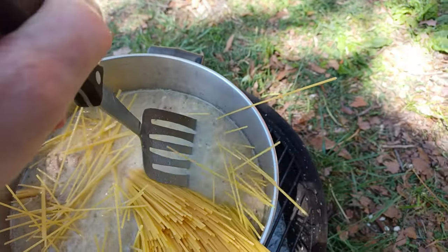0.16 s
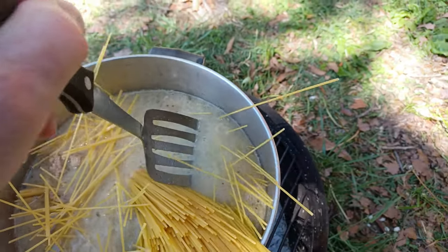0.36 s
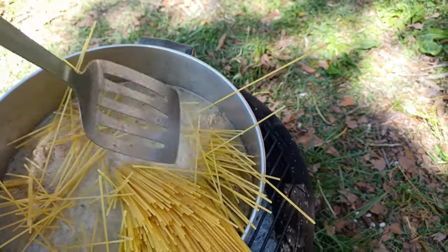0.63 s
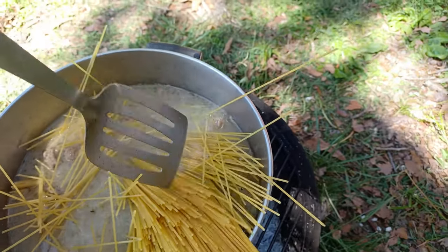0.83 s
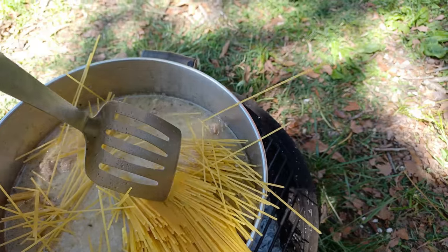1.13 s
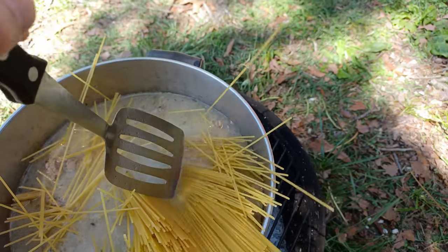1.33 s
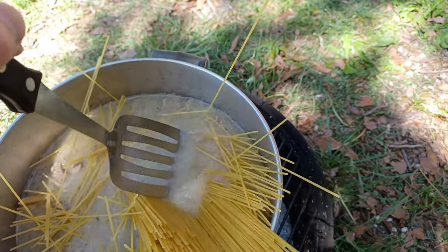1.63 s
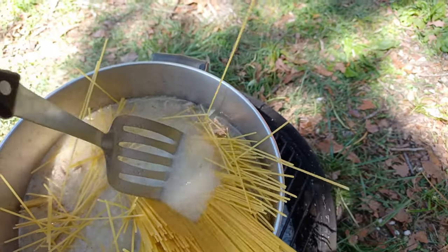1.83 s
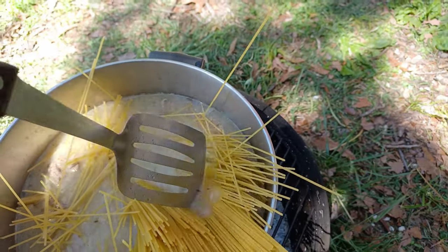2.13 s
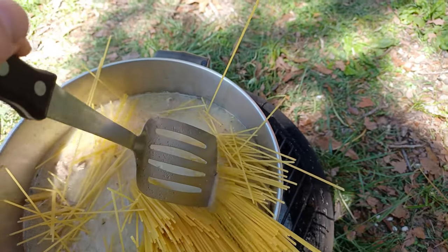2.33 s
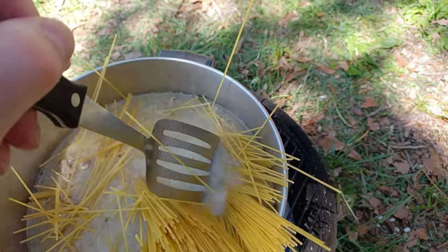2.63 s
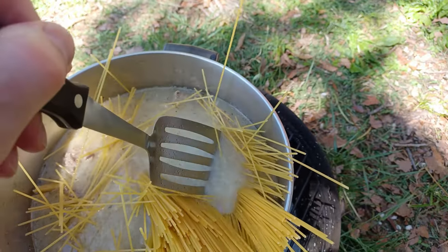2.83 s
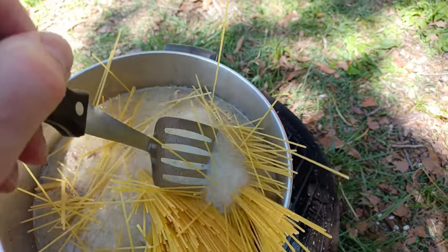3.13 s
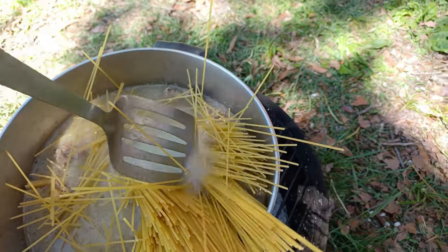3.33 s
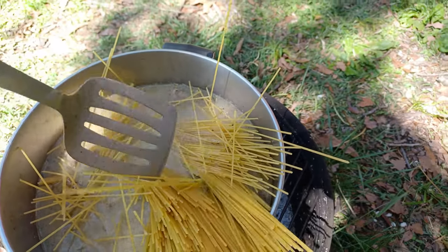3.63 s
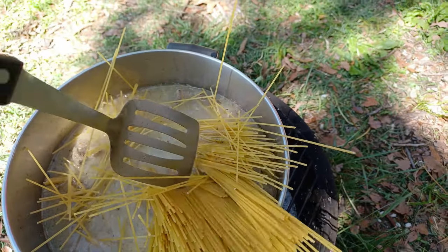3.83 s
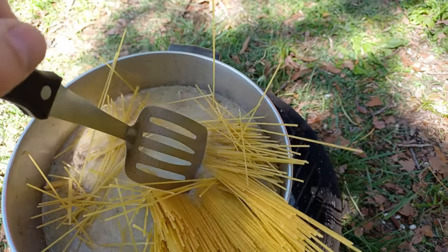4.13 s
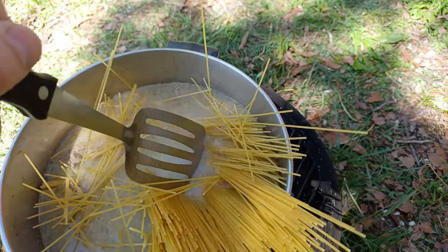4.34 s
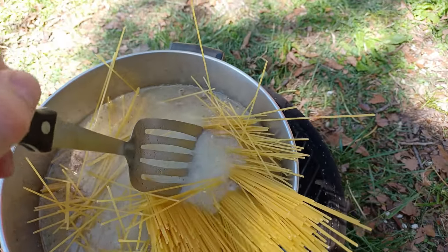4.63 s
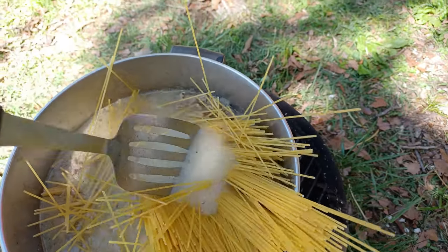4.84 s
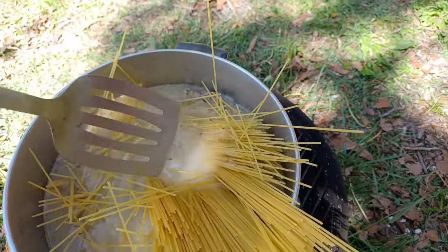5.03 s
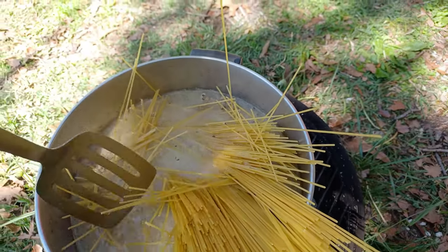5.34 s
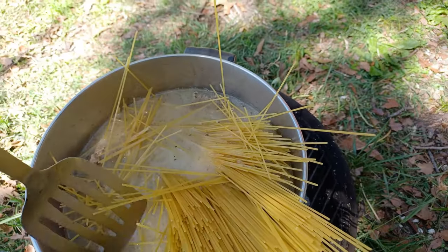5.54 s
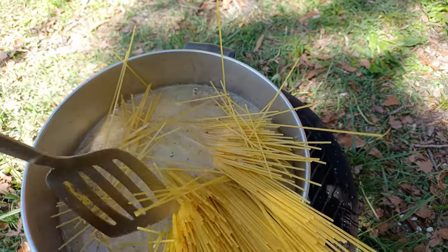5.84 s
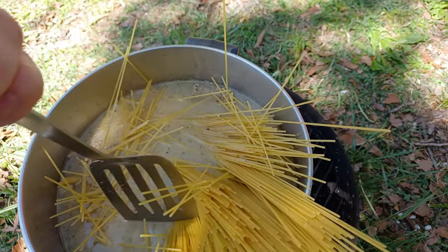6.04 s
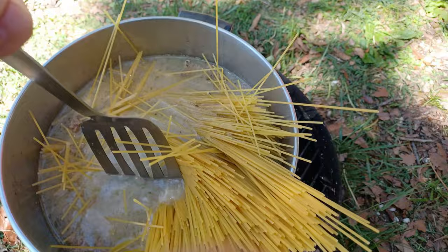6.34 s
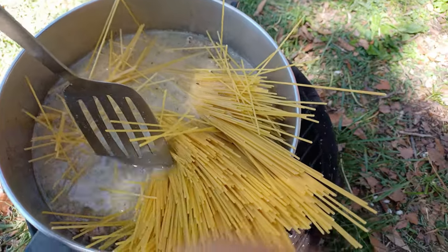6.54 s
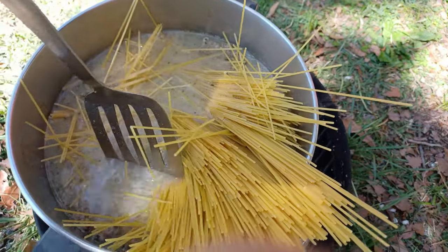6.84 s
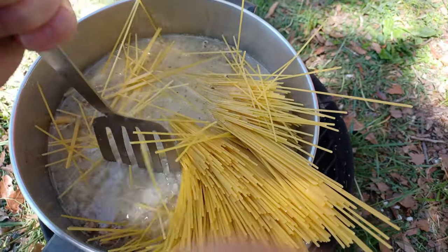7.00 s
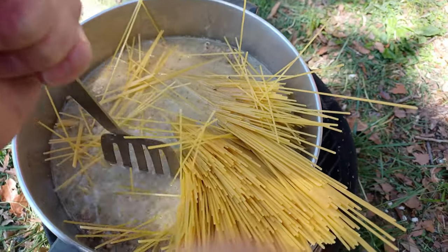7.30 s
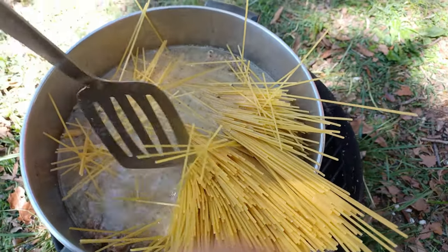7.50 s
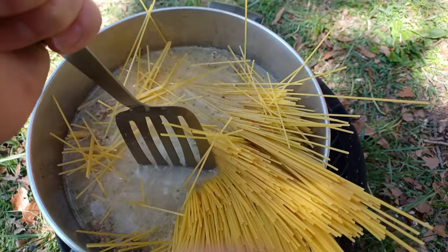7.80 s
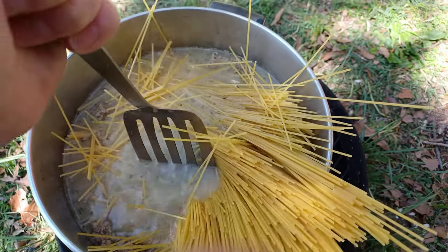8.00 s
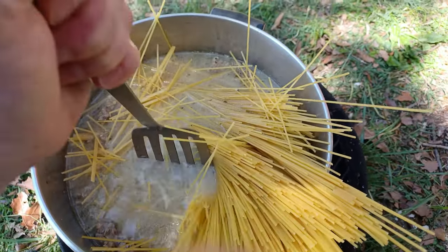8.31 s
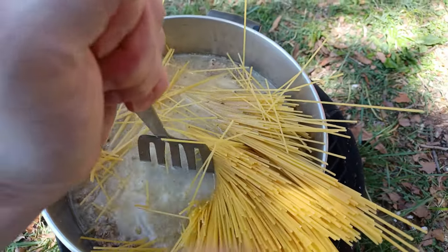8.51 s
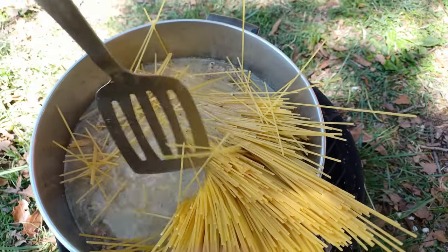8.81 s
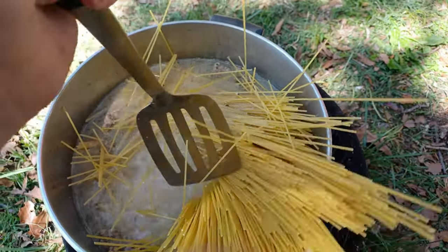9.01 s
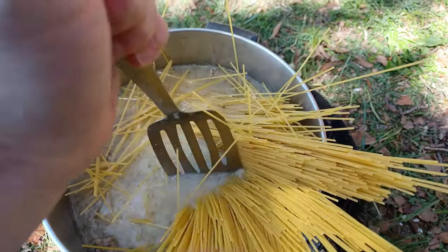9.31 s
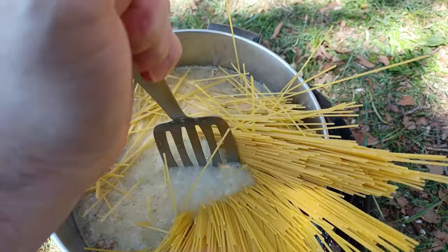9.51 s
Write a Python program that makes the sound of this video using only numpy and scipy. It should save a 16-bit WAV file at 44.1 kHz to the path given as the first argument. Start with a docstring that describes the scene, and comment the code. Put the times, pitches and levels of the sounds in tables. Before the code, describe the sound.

Close stereo outdoors, over quiet open air and a fine simmering fizz. At 0-0.35 s brittle pasta strands snap in quick, dry clicks. From 0.4 to 1.65 s a bird whistles clear falling notes with short links, echoing in trees, while water sizzles in short swells, strong near 0.9 s. A single snap comes at 1.6 s, then a soft, woody cluster at 2.3-3.1 s, ending in a tiny rising squeak. Hiss surges near 3.8 s; faint lower rising whistles run 3.6-4.8 s, with a few snaps around 4.6 s. A bright metal knock lands at 5.4 s. Wind thumps and rumbles from about 5.4 s, strongest around 6.1 s, returning until 9.4 s. Sharp cracking bursts at 6.9-7.1 s, a strong sizzle at 7.6 s, then the densest, loudest crunching at 8.0-8.5 s with hollow pot thuds. Hiss swells at 9 s; last snaps come at 9.3-9.65 s.

```python
"""At an outdoor grill, a steel spatula pushes dry spaghetti into a metal pot of boiling water.
Strands snap singly and in bundles, as shaped noise clicks that ring the pot through decaying modes.
Water slops sizzle as swelling bands of random bursts; gusts are low noise on the close microphone.
A songbird whistles two phrases of gliding sines; the blade squeaks once and knocks the pot."""
import sys
import numpy as np
from scipy import signal
from scipy.fft import rfft, irfft, next_fast_len
from scipy.io import wavfile
from scipy.ndimage import uniform_filter1d

SR = 44100
rng = np.random.default_rng(int(sys.argv[2]) if len(sys.argv) > 2 else 0)


def output_pcm(signal):
    """Save a mono or channel-first signal as 16-bit PCM at the path in sys.argv[1].

    Samples are clipped to [-1, 1] before scaling.
    """
    pcm = np.clip(np.atleast_2d(signal).T, -1, 1) * 32767
    wavfile.write(sys.argv[1], SR, np.round(pcm).astype(np.int16))


N = 426006
T = np.arange(N) / SR
T_COARSE = T[::32]  # for slow envelopes
LEAD_S = .005  # room for the rise before a break
TOP_HZ = 16150
# Stereo balance of the pot. Each row: frequency in Hz, left minus right in dB.
POT_PAN = [(600, 1.5), (1290, 8), (2380, 7.5), (4400, 3.5), (8000, -0.5), (15000, 4.5)]


def undb(db):
    """Decibels to gain."""
    return 10 ** (np.asarray(db) / 20)


def unit(x):
    """Scale to rms 1."""
    return x / np.sqrt(np.mean(x ** 2) + 1e-20)


def along(points, hz):
    """Read a (Hz, dB) spectrum on a log-frequency axis."""
    point_hz, point_db = np.transpose(points)
    return np.interp(np.log(hz + 1), np.log(point_hz), point_db)


def coloured(x, points):
    """Filter a signal by a (Hz, dB) response."""
    size = next_fast_len(N)
    gain = undb(along(points, np.fft.rfftfreq(size, 1 / SR)))
    return irfft(rfft(x, size) * gain, size)[..., :N]


def walk(rate_hz):
    """Smooth random curve with a spread near 1: lines between random knots."""
    knots = rng.standard_normal(4096)
    return 1.2 * np.interp(T * rate_hz, np.arange(len(knots)), knots)


def pair(size, likeness):
    """Left and right noise with a shared part."""
    noise = rng.standard_normal((3, size))
    shared = np.clip(likeness, 0, 1)
    return np.sqrt(shared) * noise[0] + np.sqrt(1 - shared) * noise[1:]


def sides(pan_db):
    """Left and right gains of constant total power; pan is left minus right."""
    gain = undb(np.array([[.5], [-.5]]) * pan_db)
    return gain / np.sqrt(np.mean(gain ** 2, axis=0))


def add(out, start_s, x):
    """Mix a short sound in, trimmed at both ends of the scene."""
    i = min(int(start_s * SR), N - 1)
    x, i = x[:, max(-i, 0):], max(i, 0)
    out[:, i:i + x.shape[1]] += x[:, :N - i]


def ring(x, modes):
    """Resonance: convolve with decaying sines of (Hz, dB, t60 s), alternating in sign."""
    t = np.arange(SR // 3) / SR
    response = np.zeros(len(t))
    for k, (hz, db, t60_s) in enumerate(modes):
        response += (-1) ** k * undb(db - 60 * t / t60_s) * np.sin(2 * np.pi * hz * t)
    return signal.fftconvolve(x, response[None], axes=1)


def echoes(x, t60_s):
    """Diffuse reflections: convolve with a decaying noise tail, scaled to unit energy on the left."""
    t = np.arange(SR // 2) / SR
    tail = pair(len(t), likeness=.6) * undb(-60 * t / t60_s) * (t > .003)
    return signal.fftconvolve(x, tail / np.sqrt(np.sum(tail[0] ** 2)), axes=1)[:, :N]


def disperse(hz, spread_s):
    """Bending waves are slow at low pitch, so a click's lows lag its highs (no delay at 3 kHz)."""
    return np.exp(-2j * np.pi * spread_s * (2 * np.sqrt(3000 * hz) - hz))


def crack(stub_hz, body_db, crisp_db, pan_db, rise_s=0.00076, spike_s=0.00052, shiver_s=0.0026,
          shiver=1.2, stub_db=7, stub_width=0.16, ripple_db=2, lead=0.15, lead_s=0.0011,
          spread_s=0.000467, size=1024):
    """One break: soft noise rise, spike, then stubs shivering at a pitch set by length; rms 1 over 4 ms."""
    # Colour of a break. Each row: frequency in Hz, gain in dB.
    snap_colour = [(100, -40), (280, -21.5), (400, -10.5), (700, -7), (900, -9), (1200, -6.5), (1800, -2.5),
                   (3000, 2), (4500, 4.5), (6200, 4), (8000, -1), (10000, 2), (12500, 7.5), (16000, 3)]
    t, hz = np.arange(size) / SR - LEAD_S, np.fft.rfftfreq(size, 1 / SR)
    before, after = np.minimum(t, 0), np.maximum(t, 0)
    onset = np.exp(before / rise_s) + lead * np.exp(before / lead_s)
    decay = np.exp(-after / spike_s) + shiver * np.exp(-after / shiver_s)
    left, right = rfft(pair(size, likeness=0.63) * onset * decay)

    # long waves are alike at both ports; the right one mostly hears the sound slightly later
    apart = np.clip(hz / 3000, 0, 1)
    delay_s = 6e-5 + 2.5e-5 * rng.standard_normal()
    right = (apart * right + (1 - apart) * left) * np.exp(-2j * np.pi * hz * delay_s)

    stubs = stub_db * np.exp(-(np.log((hz + 1) / stub_hz) / stub_width) ** 2)
    ripple = ripple_db * np.interp(hz, np.linspace(0, SR / 2, 48), rng.standard_normal(48))
    tilt = along([(1400, body_db), (3000, 0.02), (6500, 0.004), (10000, crisp_db)], hz)
    colour = undb(along(snap_colour, hz) + tilt + stubs + ripple) * disperse(hz, spread_s)
    x = irfft(np.array([left, right]) * colour * sides(pan_db + along(POT_PAN, hz)))
    return x / np.sqrt(np.sum(x ** 2) / (2 * .004 * SR))


def strands(snap_db=1, bundle_db=1, scatter_db=4.0, count=16):
    """Single strands snap; a bundle gives way in a shower of smaller splinters."""
    # Each row: time in seconds, relative level in dB, stub pitch in Hz, body in dB, crispness in dB.
    snaps = [(.0031, -18, 6260, 4.5, -1.5), (.068, -23, 5200, 0, -7), (0.09, -25, 6500, 4.5, 1),
             (.1123, -20, 5140, -4, -14), (.116, -17.5, 2700, -2.5, 1), (.134, -23.5, 1720, 7, -9),
             (0.1445, -29.5, 4800, 10, -8), (0.2, -21.5, 4500, 0, -3.5), (0.3398, -31.5, 7000, -2, -3),
             (1.584, -24, 5300, -2.5, -4.5), (2.3, -32.5, 1270, 8.5, -3), (2.359, -37.5, 1390, -1, -5),
             (2.376, -37.5, 5700, 6, 2), (2.516, -25, 1650, 6, 2), (2.539, -35.5, 1350, 7, 0),
             (2.5739, -25.5, 1750, 11.5, 2), (2.6704, -25, 5900, 2.5, 0), (2.674, -24.5, 7300, 1, -4),
             (2.6933, -28, 1640, 11, 2.5), (2.7776, -26, 6700, -8, 14), (2.834, -33.5, 3830, 10, -2.5),
             (2.8677, -25, 1320, 12, .5), (2.8889, -25.5, 1620, 11, -2), (2.8995, -21.5, 1720, 14, 2.5),
             (2.9122, -24.5, 1610, 15.5, 0), (2.969, -29, 1280, 13, -5), (2.98, -28, 1600, 12, 0),
             (3.0018, -27.5, 1290, 10.5, -4), (3.0126, -21, 1310, 11, 0.5), (3.0304, -26.5, 1410, 11, -10),
             (3.0367, -20, 1300, 9.5, -3), (3.0438, -27.5, 1280, 19, 2), (3.0893, -35.5, 7140, 4, 3),
             (3.8822, -36, 3930, 2, -3), (4.51, -37, 3870, -2, -15), (4.5408, -34.5, 1320, 2, -5),
             (4.611, -34, 4900, 9.5, -3.5), (4.6389, -25.5, 1270, 3, -2), (4.652, -23.5, 1740, 9, -4),
             (4.6884, -25.5, 4870, 12, 0.5), (5.96, -29, 1310, 5, -1.5), (6.102, -27.5, 3290, 7, 9),
             (6.1407, -28.5, 3900, 4, 3), (6.2228, -27.5, 4470, -2, -4), (6.884, -24.5, 2900, -6, 0.5),
             (6.935, -18, 4140, 5, 9), (6.9433, -14, 5070, -7.5, -7), (6.9484, -28, 2700, -8, 13),
             (6.999, -18, 4600, -1, 7), (7.0173, -16, 5100, 5, -2), (7.025, -18, 2870, -4, -4),
             (7.732, -33.5, 1390, 9, 12), (7.8295, -28, 2980, -8, 0.5), (7.8538, -28, 1290, 5, 2.5),
             (7.8702, -25, 1760, 6, 5.5), (8.0167, -20, 1700, 8.5, 3.5), (8.027, -17.5, 5130, -5, -1),
             (8.0598, -12.5, 5200, -1.5, -0.5), (8.073, -19.5, 5400, -1, -2), (8.1065, -15, 5300, 2, 0.5),
             (8.114, -30, 3900, 9, -4), (8.1284, -18.5, 3290, 6, 2), (8.1325, -13, 2900, -4, 2.5),
             (8.155, -23, 5460, -4, 1.5), (8.1684, -18, 1300, -8, 6), (8.18, -14, 1980, 7, 6),
             (8.2534, -21, 4040, -12, 2), (8.2803, -13, 2040, -6, -1), (8.2894, -16.5, 2670, -4, -4),
             (8.295, -12, 2250, 4, 2.5), (8.3183, -20, 2100, 5, 2), (8.3264, -18.5, 3320, -7, -17),
             (8.3663, -16, 4360, -4, -5.5), (8.3919, -20.5, 3530, -4, -6), (8.4475, -28, 2680, 13.5, -5),
             (8.453, -24, 3770, 2, 9), (8.467, -22, 3910, 15.5, -10), (9.32, -31.5, 1490, 10, -5),
             (9.372, -17, 4670, 10, -2), (9.3824, -15, 3220, 2, -2), (9.463, -23, 4330, -2, -1.5),
             (9.4983, -26, 5950, 3, -4.5), (9.5573, -26.5, 3740, 9.5, 1), (9.6245, -31.5, 2360, -1, -4),
             (9.6335, -25, 3640, 3, 2.5), (9.652, -26, 2900, -7, -10)]
    # Each row: start in seconds, end in seconds, relative level in dB, splinters per second,
    # body in dB, crispness in dB.
    bundles = [(0.108, .152, -30, 960, -0.5, -4), (0.164, .207, -42.5, 190, 11, -3),
               (2.884, 2.918, -35, 880, 6, -4), (3.022, 3.075, -38.5, 740, 11, -3),
               (4.639, 4.702, -38, 203, 13.5, -6), (5.375, 5.413, -44, 500, 6, -4),
               (6.936, 7.038, -29, 810, 2, -1.5), (7.038, 7.094, -27, 2150, 6.5, -7),
               (8.044, 8.163, -47.5, 210, 10, -19), (8.148, 8.251, -26, 810, 4.5, -2),
               (8.246, 8.334, -21, 1600, 2, -4), (8.33, 8.353, -31, 316, 0, -18),
               (8.441, 8.482, -34.5, 580, 7, -6)]
    out = np.zeros((2, N))
    for s, db, stub_hz, body_db, crisp_db in snaps:
        pan_db = 1.5 + 2 * rng.standard_normal()
        snap = crack(stub_hz, body_db, crisp_db, pan_db)
        add(out, s - LEAD_S + .0003, undb(db + snap_db) * snap)
    for start, end, db, rate_hz, body_db, crisp_db in bundles:
        splinters = [crack(hz, body_db, crisp_db, pan_db=-2.5) for hz in np.geomspace(1500, 6500, count)]
        chance = rng.random((160, 3))[:max(int((end - start) * rate_hz), 2)]
        sizes = unit(undb(-scatter_db * np.log(chance[:, 1]))) / np.sqrt(.004 * rate_hz)
        for (when, _, which), size in zip(chance, sizes):
            splinter = splinters[int(which * len(splinters))]
            add(out, start - LEAD_S + when * (end - start), undb(db + bundle_db) * size * splinter)
    return out


def pot(breaks, bottom_db=-54, thud_db=-8, thud_t60_s=0.18, metal_db=-56, wall_db=-16, wall_t60_s=0.096):
    """Breaks thud through the water, ring the bottom and the thin metal, and bounce between the walls."""
    # Spatula presses; place and force set the bottom's note.
    # Each row: start in seconds, end in seconds, pitch in Hz, relative ring and thud level in dB.
    presses = [(0, 2, 397, 1), (2, 4, 407.7, 1.5), (4, 6.5, 400, -3), (6.5, 7.6, 381, 11.5),
               (7.9, 8.15, 334, 12.5), (8.15, 8.43, 338.6, 17), (8.43, 9.2, 338, 13.5),
               (9.2, 9.7, 398, -11)]
    # Water-loaded bottom. Each row: ratio to its pitch, relative level in dB, t60 in seconds.
    bottom = [(1, 4, 0.29), (1.13, 4.5, 0.063), (1.36, -41, 0.042), (1.62, -27, 0.036), (1.9, -2, 0.028)]
    # Pot wall and spatula blade. Each row: frequency in Hz, relative level in dB, t60 in seconds.
    metal = [(752.4, 5.5, 0.17), (1060, -1, 0.092), (1610, -7, 0.23), (1622, 10.5, 0.067),
             (1920, -20, 0.081), (2336, 6, 0.14), (2960, 0.5, 0.11), (3420, -28, 0.091), (3540, -23, .1),
             (3830, -1.5, 0.17), (5300, -28, .1), (6600, -10, .1)]
    out = undb(metal_db) * ring(breaks, metal)[:, :N]
    out += undb(wall_db) * echoes(breaks, wall_t60_s)
    thud_colour = [(250, -24), (335, 11), (420, 5.5), (600, -8.0), (760, 0.5), (950, -19.5), (3000, -52)]
    thud = coloured(echoes(breaks, thud_t60_s), thud_colour)
    for start, end, hz, db in presses:
        press = slice(max(int(start * SR), 0), int(end * SR))
        modes = [(ratio * hz, mode_db, t60_s) for ratio, mode_db, t60_s in bottom]
        add(out, start, undb(bottom_db + db) * ring(breaks[:, press], modes))
        add(out, start, undb(thud_db + db) * thud[:, press])
    return out


def ticks(tick_db=-53, range_db=9, count=130):
    """Loose strands shift and tick faintly against each other, as quiet breaks at random times."""
    out = np.zeros((2, N))
    for when, loud, pitch in rng.random((count, 3)):
        tick = crack(3000 + 3000 * pitch, body_db=-12, crisp_db=4.5, pan_db=-0.5)
        add(out, when * N / SR, undb(tick_db + range_db * loud ** 2) * tick)
    return out


def steam_flow(slop_range_db=23.5, rise_bend=2.07, fade_bend=1.71):
    """Hiss, spray and fizz strength: slops swell and boil off over a steady simmer, summed as power."""
    # Water on the hot wall. Each row: peak in seconds, rise in seconds, fade in seconds,
    # relative hiss in dB, fine spray over hiss in dB, low fizz over hiss in dB (before band trims).
    slops = [(.15, .3, 0.15, -52, -10, -3), (.37, .04, 0.14, -61.5, -6, -6),
             (.56, .16, .11, -47, -8, -13.5), (0.863, 0.038, 0.11, -41, 1, -6.5),
             (1.01, 0.12, 0.11, -52, -1, -6), (1.144, 0.03, .1, -47.5, 2.5, -18),
             (1.21, 0.096, 0.19, -50, -4, -5), (1.335, 0.089, 0.16, -51.5, -3, -9),
             (1.52, 0.025, 0.064, -58.5, -8, -10), (1.62, 0.037, 0.14, -57.5, -2, -8),
             (1.88, 0.09, 0.48, -50, -5, -11), (2.29, 0.19, 0.36, -53, -7, -4),
             (2.85, 0.41, 0.93, -58.5, -3, -4), (3.27, 0.16, .22, -47.5, 1, -8),
             (3.634, 0.01, 0.076, -50.5, 0, -35), (3.71, 0.017, 0.19, -46, 6, -24),
             (3.795, 0.08, 0.16, -40.5, 0, -4), (4.14, 0.14, .15, -48.5, -4.5, -8),
             (4.55, 0.58, 0.47, -62.5, -6, -1.5), (4.911, 0.29, 0.15, -46, 1, -7.5),
             (5.2, 0.092, 0.072, -50, 3, -28), (5.295, 0.027, 0.18, -48.5, -0.5, -15),
             (5.42, 0.07, 0.09, -53, -7, -1), (5.6, 0.36, 0.36, -53.5, 4, -15),
             (5.89, 0.13, 0.18, -40.5, -1.5, -11), (6.09, 0.22, 0.12, -47, 1.5, -1.5),
             (6.21, 0.036, 0.15, -51, -12, -4), (6.43, 0.14, 0.17, -50, -2, -12),
             (6.64, 0.069, 0.15, -50.5, -4, -19), (6.75, 0.1, 0.063, -46, -0.5, -14.5),
             (6.88, 0.11, 0.36, -52.5, -9, -10), (7.47, 0.084, .13, -48, -0.5, -10),
             (7.585, 0.022, 0.081, -38.5, 1.5, -27), (7.645, 0.065, 0.13, -36.5, -0.5, -4.5),
             (7.825, 0.067, 0.064, -42.5, 2, -8), (8.64, 0.23, 0.88, -57.5, 1, -13),
             (8.945, 0.049, 0.15, -46.5, 12, -25), (9.025, 0.11, 0.13, -38.5, -3, -4),
             (9.32, 0.19, 0.087, -48.5, -5, -6.5), (9.62, 0.4, .2, -58.5, -4, -3.5)]
    # Between slops: relative hiss in dB, fine spray over hiss in dB, low fizz over hiss in dB.
    simmer = (-70, -10, -1.9)

    def power(db, spray_db, fizz_db):
        return undb(db + np.array([[0], [spray_db], [fizz_db]])) ** 2

    total = power(*simmer)
    for s, rise_s, fade_s, db, spray_db, fizz_db in slops:
        # away is 1, and the level down by slop_range_db, after the rise or fade time
        away = (np.maximum(s - T_COARSE, 0) / rise_s) ** rise_bend
        away += (np.maximum(T_COARSE - s, 0) / fade_s) ** fade_bend
        total = total + power(db - slop_range_db * away, spray_db, fizz_db)
    return [np.interp(T, T_COARSE, np.sqrt(p)) for p in total]


def shifting(x, depth_db, size=512):
    """Patches of froth come and go: narrow bands swell and fade by smoothed random gains."""
    _, _, cells = signal.stft(x, nperseg=size)
    patches = rng.standard_normal(cells.shape[1:])
    for _ in range(2):
        patches = uniform_filter1d(patches, size=5, axis=0)
        patches = uniform_filter1d(patches, size=14, axis=1)
    return signal.istft(cells * undb(depth_db * unit(patches)), nperseg=size)[1][:, :N]


def sizzle(hiss_db=1.0, spray_db=-3.0, fizz_db=0.5, grain_db=2.5, flicker_db=2.37, patchy_db=2):
    """Countless tiny steam bubbles burst where water meets hot metal: sparse noise in three bands."""
    # Each row: frequency in Hz, gain in dB.
    sizzle_colour = [(350, -15), (600, -2.5), (740, -1.5), (920, -12), (1100, -0.5), (1350, -0.5),
                     (1750, -4.5), (2400, -3.5), (3200, -12.5), (4400, -1.5), (6000, 2), (8500, -5.5),
                     (12000, -2), (15800, -9.5)]
    hiss, spray, fizz = steam_flow()
    bursts = (rng.random(N) < .4) * undb(grain_db * np.minimum(rng.exponential(size=N), 4))
    grains = pair(N, likeness=0.015) * bursts * undb(flicker_db * walk(60))
    steam = coloured(shifting(grains, patchy_db), sizzle_colour)
    pans = [[(hz, sign * db / 2) for hz, db in POT_PAN] for sign in (1, -1)]
    steam = np.array([coloured(x, pan) for x, pan in zip(steam, pans)])
    # big, middling and fine bubbles
    low = coloured(steam, [(400, -11), (900, -1), (1200, 2.5), (1800, 1), (3200, -11.5), (6000, -52)])
    middle = coloured(steam, [(900, -44), (2000, -17.5), (3200, 6.5), (7000, -8), (11000, -14), (16000, -6.5)])
    high = coloured(steam, [(4000, -51), (7000, -9.5), (9500, -2.5), (16000, 1.5)])
    out = unit(low) * fizz * undb(fizz_db)
    out += unit(middle) * hiss * undb(hiss_db)
    return out + unit(high) * spray * undb(spray_db)


def wind_force(breeze_db=2.5, flutter_db=3, flutter_hz=18, gust_edge_db=10, gust_bend=2.6):
    """Strength of the wind: rounded gusts, down by gust_edge_db at both ends, over a fluttering breeze."""
    # Each row: time in seconds, relative level in dB.
    breeze_points = [(0.0, -66.5), (5.35, -64.5), (6.13, -42.5), (6.48, -58.5), (8.74, -50), (8.85, -50),
                     (9.66, -48)]
    # Each row: middle in seconds, length in seconds, relative level in dB.
    gusts = [(0.137, .06, -52), (0.524, 0.12, -51), (0.783, 0.076, -55), (2.801, 0.054, -39.5),
             (2.993, 0.28, -54), (4.038, 0.1, -48), (4.746, 0.082, -39), (4.86, 0.14, -49),
             (5.438, 0.081, -37.5), (5.699, 0.028, -39.5), (5.79, .04, -42.5), (5.928, 0.13, -44),
             (6.058, 0.1, -27.5), (6.146, .09, -30.5), (6.207, 0.036, -25), (6.362, 0.35, -46),
             (6.756, 0.067, -43), (7.059, 0.067, -33), (7.189, 0.092, -32), (7.392, 0.22, -39),
             (7.55, 0.14, -34.5), (8.251, 0.038, -25), (8.339, 0.14, -37), (8.53, .04, -42),
             (8.87, 0.25, -36), (9.025, 0.1, -28), (9.118, 0.044, -34.5), (9.254, 0.023, -35.5),
             (9.37, .06, -35.5)]
    gust_power = np.zeros(len(T_COARSE))
    for s, length_s, db in gusts:
        away = np.abs(2 * (T_COARSE - s) / length_s) ** gust_bend
        gust_power += undb(db - gust_edge_db * away) ** 2
    level_db = np.interp(T, *np.transpose(breeze_points)) + breeze_db
    breeze = undb(level_db + flutter_db * walk(flutter_hz))
    return np.sqrt(breeze ** 2 + np.interp(T, T_COARSE, gust_power))


def air(buffet_db=1, outdoors_db=-62):
    """Gusts rumble on the microphone ports over a quiet open-air background, both coloured noise."""
    # Wind rumble. Each row: frequency in Hz, gain in dB.
    buffet_colour = [(20, -16), (45, -17), (70, -1), (115, 2), (170, -10.5), (250, -13), (330, -22.5),
                     (500, -33.5), (900, -49.5), (2000, -64)]
    # Open-air background. Each row: frequency in Hz, gain in dB.
    outdoors_colour = [(30, -11), (100, -2), (250, 5), (340, -7.5), (600, -10), (1200, -15.5),
                       (3000, -19.5), (8000, -22), (16000, -47)]
    rumble = unit(coloured(pair(N, likeness=0.22), buffet_colour)) * wind_force() * undb(buffet_db)
    outdoors = unit(coloured(pair(N, likeness=0.51), outdoors_colour))
    return rumble + outdoors * undb(outdoors_db + walk(2.43))


def bird(bird_db=1, pan_db=2, waver=0.0026, trees_db=-10, trees_t60_s=0.82):
    """Pure whistles, slurred down in the first phrase and up in the second, echoing in the trees."""
    # First phrase: long falling notes, short links between them; second phrase: rising notes.
    # Each row: start in seconds, length in seconds, pitch in Hz, relative level in dB.
    falling_notes = [(.41, 0.14, 2634, -58.5), (.655, 0.15, 2590, -49.5), (.915, .145, 2580, -50.5),
                     (1.19, 0.15, 2525, -51), (1.46, .13, 2526, -51.5)]
    short_notes = [(.547, 0.02, 2570, -47.5), (.812, .025, 2550, -57), (1.075, 0.044, 2560, -60),
                   (1.333, 0.019, 2564, -49.5), (1.618, .035, 2470, -61)]
    rising_notes = [(3.61, 0.12, 1785, -75), (3.975, 0.16, 1785, -59), (4.31, 0.14, 1770, -62.5),
                    (4.65, 0.17, 1730, -63)]
    # Note shapes. Each row: share of the note, pitch ratio, relative level in dB.
    falling = [(0, 1.005, -10), (.15, 1, -3), (.6, .995, 0), (.75, .975, -3), (.88, .925, -8),
               (1, .885, -13)]
    short = [(0, .99, -3), (.5, 1, 0), (1, .99, -6)]
    rising = [(0, .865, -9), (.2, .93, -6), (.4, .985, -2), (.65, 1, 0), (1, .995, -4)]
    out = np.zeros((2, N))
    for notes, shape in (falling_notes, falling), (short_notes, short), (rising_notes, rising):
        share, ratio, swell_db = np.transpose(shape)
        for s, length_s, hz, db in notes:
            u = np.linspace(0, 1, int(length_s * SR))
            wobble = np.interp(u, np.linspace(0, 1, 12), rng.standard_normal(12))  # pitch and level
            pitch_hz = hz * np.interp(u, share, ratio) * (1 + waver * wobble)
            loud = undb(db + bird_db + np.interp(u, share, swell_db) + wobble)
            loud = loud * signal.windows.tukey(len(u), .2)
            tone = np.sqrt(2) * np.sin(2 * np.pi * np.cumsum(pitch_hz) / SR)
            add(out, s, sides(pan_db) * loud * tone)
    return out + undb(trees_db) * echoes(out, trees_t60_s)


def squeak(start_s=3.066, length_s=0.035, from_hz=2350, to_hz=3050, db=-42):
    """The blade slips on the pasta with a short squeak: a rising sine."""
    out, pitch_hz = np.zeros((2, N)), np.linspace(from_hz, to_hz, int(length_s * SR))
    tone = np.hanning(len(pitch_hz)) * np.sin(2 * np.pi * np.cumsum(pitch_hz) / SR)
    add(out, start_s, undb(db) * sides(5.5) * tone)
    return out


def spatula(tap_db=-2, contact_t60_s=0.0076, free_db=-21, click_db=-1.0, size=8192):
    """A knock on the pot rings the blade's modes: a strong part choked by contact plus a faint free one."""
    # Each row: time in seconds, relative level in dB.
    taps = [(5.199, -37.5), (5.3743, -14.5), (5.398, -40), (5.573, -39.5)]
    # Blade modes. Each row: frequency in Hz, relative level in dB, free t60 in seconds.
    blade = [(2930, -9, 0.12), (4520, 2, 0.087), (6530, 3, 0.094), (8300, -6, 0.08), (11670, 3, 0.057),
             (12300, -12, .05), (14700, -3, .04)]
    out, t = np.zeros((2, N)), np.arange(size) / SR
    for s, db in taps:
        knock = np.zeros((2, size))
        for hz, mode_db, t60_s in blade:
            decay = undb(-60 * t / contact_t60_s) + undb(free_db - 60 * t / t60_s)
            cycles = hz * t + rng.random() + 0.15 * rng.random((2, 1))
            knock += undb(mode_db) * decay * np.sin(2 * np.pi * cycles)
        add(out, s, undb(db + tap_db) * knock * np.minimum(t / 0.0018, 1))
        click = crack(6000, body_db=-12.5, crisp_db=2.5, pan_db=-2)
        add(out, s - LEAD_S + 0.0005, undb(db + click_db) * click)
    return out


def scene():
    """Pasta, pot and steam close by; wind and bird around them."""
    breaks = strands()
    pasta_and_pot = breaks + pot(breaks) + ticks() + squeak() + spatula()
    return pasta_and_pot + sizzle() + air() + bird()


def record(dry):
    """Clip at full scale, then cut steeply above TOP_HZ."""
    lowpass = signal.ellip(10, .2, 70, TOP_HZ, fs=SR, output="sos")
    return signal.sosfilt(lowpass, np.clip(dry, -1, 1))


dry = scene()
out = record(dry)
output_pcm(out)
```